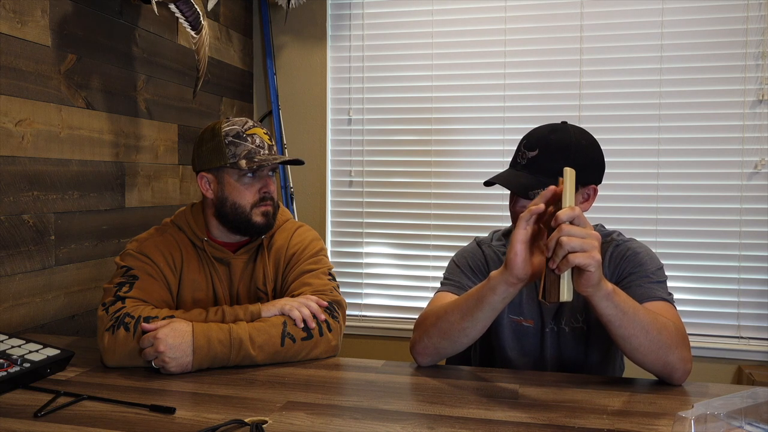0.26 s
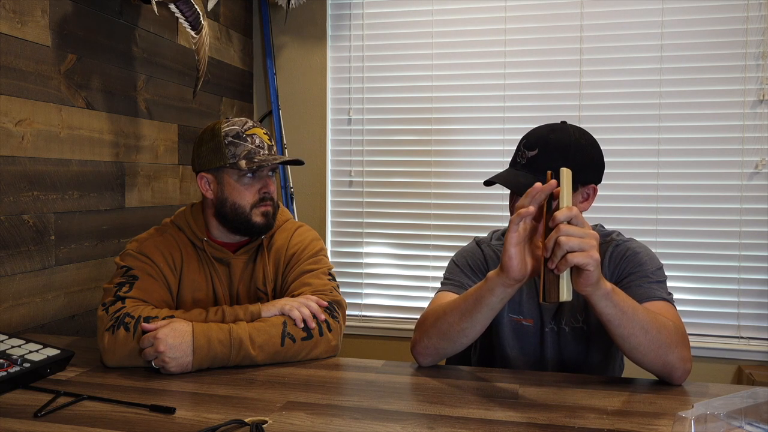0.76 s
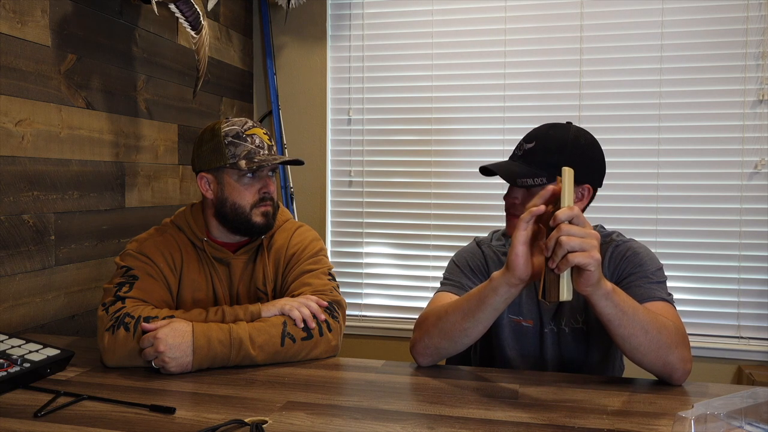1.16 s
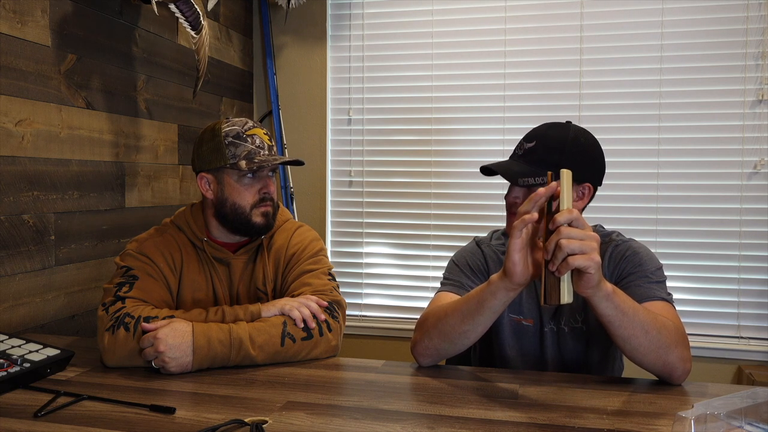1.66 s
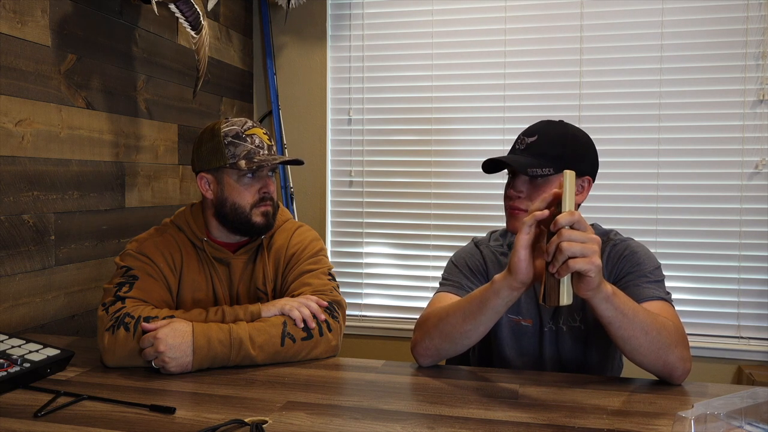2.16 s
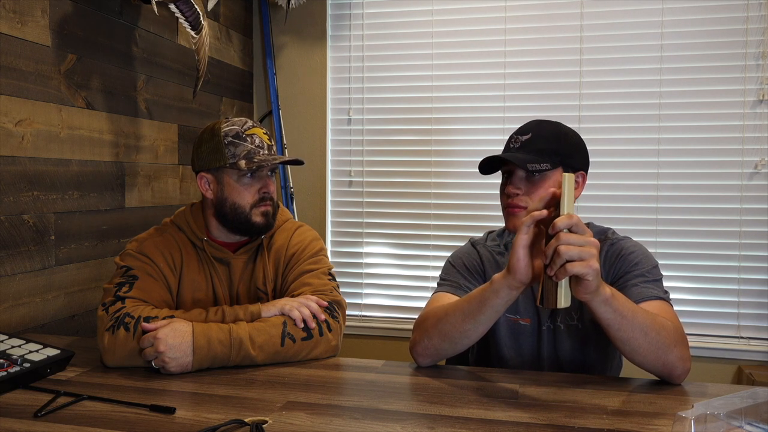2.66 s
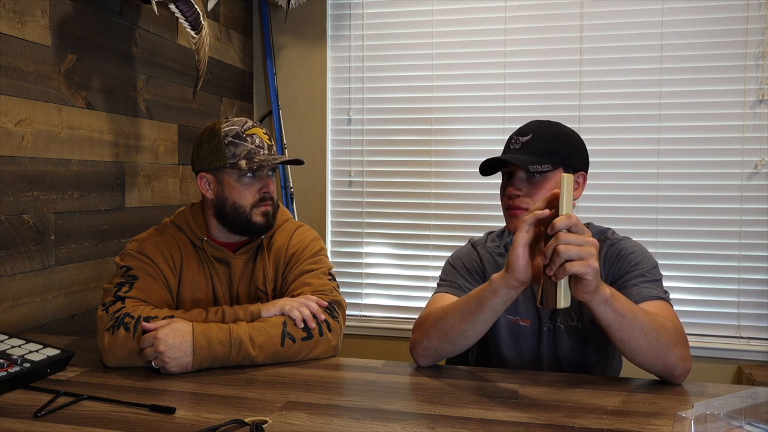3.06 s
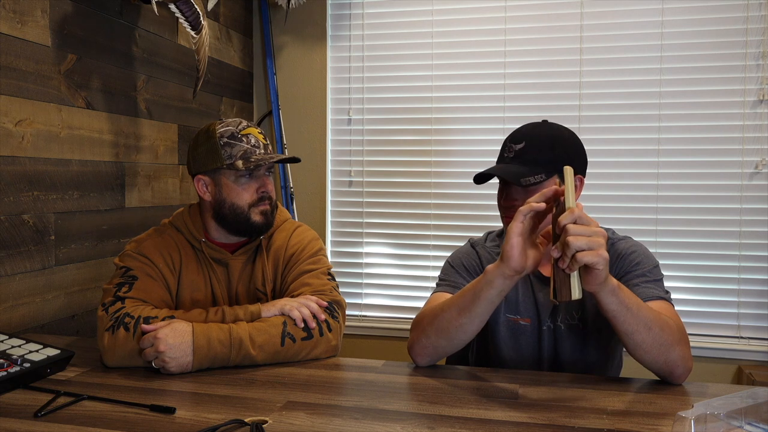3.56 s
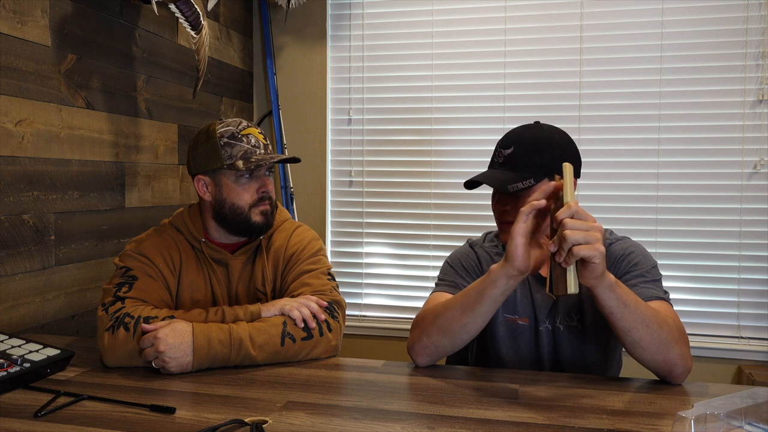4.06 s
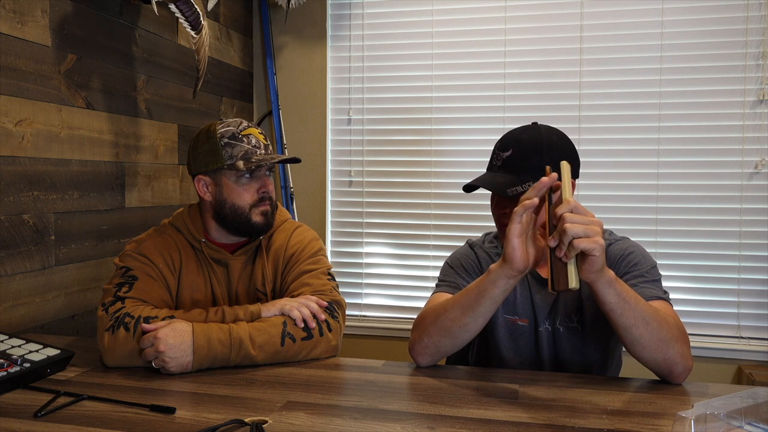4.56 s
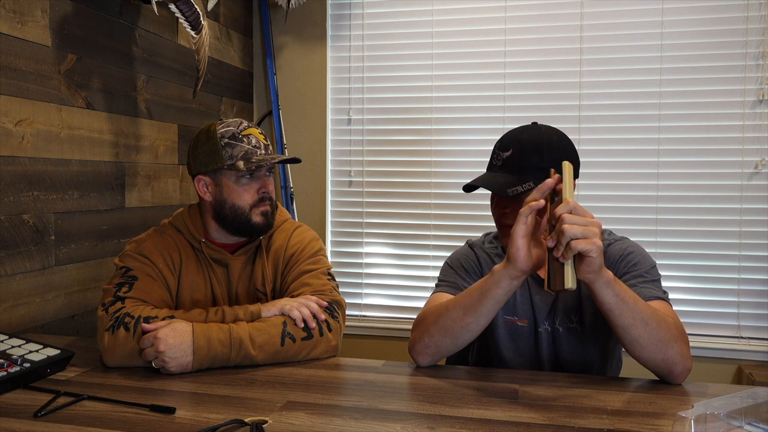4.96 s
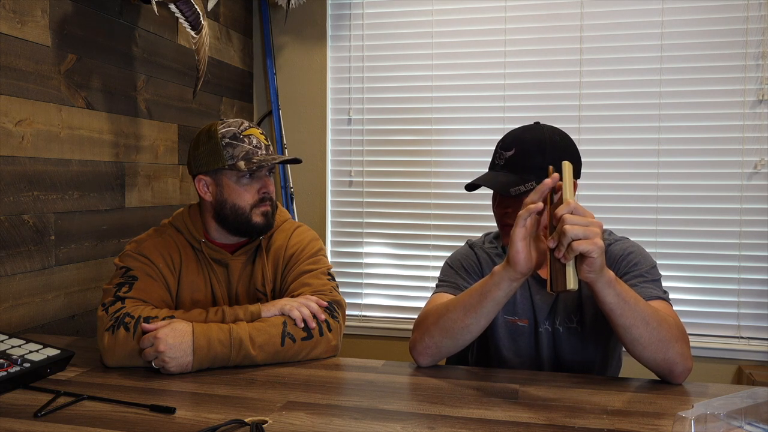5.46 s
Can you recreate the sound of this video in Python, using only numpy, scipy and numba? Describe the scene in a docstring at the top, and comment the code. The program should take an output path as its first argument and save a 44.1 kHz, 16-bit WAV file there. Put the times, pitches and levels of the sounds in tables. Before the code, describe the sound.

Close, loud wooden box call in a small room: about three even yelps a second, each starting with a short clear high note, cracking into a rasp and dropping to a hollow lower note. After eleven strokes there is a short gap with a faint wooden tap, then eight more yelps, softer-edged at first, then brighter. Short table echoes and room tail; low rumble and thin hiss stay behind.

```python
"""Wooden box call indoors

A chalked lid is stroked over the thin wall of a box and sticks and slips hundreds of times a second.
Most strokes start clean, break into a rasp and roll over to a lower note; box modes colour the slips.
Table echoes and a small room ring after them, over low rumble, thin hiss and faint squeaks.
A limiter pulls the whole mix down, rumble included, whenever its peaks pass the ceiling."""
import sys
import numpy as np
from scipy import signal
from scipy.fft import rfft, irfft, next_fast_len
from scipy.io import wavfile
from scipy.ndimage import uniform_filter1d, minimum_filter1d, map_coordinates
from numba import njit

SR = 44100
rng = np.random.default_rng(int(sys.argv[2]) if len(sys.argv) > 2 else 0)


def log_audio(samples):
    """Write samples as a 16-bit WAV file to the path given in sys.argv[1]."""
    # one column per channel
    frames = np.atleast_2d(samples).T
    # limit to full scale, then quantise
    limited = np.clip(frames, -1, 1)
    pcm = np.round(limited * 32767).astype(np.int16)
    wavfile.write(sys.argv[1], SR, pcm)


N = 251811

# strokes of the lid; all times but start_s and the two lengths count from the start of the stroke:
# start_s, catch_hz, clean_length_s, clean_hz, break_hz, break_raspiness (0-1), roll_length_s,
# low_reached_s, low_hz, low_left_s, lift_hz, catch_force_db, low_force_db, ease_force_db,
# brightness_db, slide_back_db (all levels relative)
STROKES = [ (0.033, 890.6, 0.03, 793.7, 954.5, 0.77, 0.018, 0.084, 651, 0.099, 730, -8.5, 2, -11, 2, -42),
           (0.331, 868, 0.035, 782.2, 947, 0.58, .015, 0.071, 650.6, 0.084, 740, -3, 5.5, -9.5, 0.5, -43),
           (0.617, 855, 0.049, 782.6, 916, 0.74, 0.016, 0.083, 644.2, 0.098, 714, -11.5, 2.5, -8.5, 1, -41.5),
           (0.925, 899, 0.023, 788, 934, 0.5, 0.033, 0.079, 710, .099, 777.4, -8, -2.5, -11.5, 0, -42.5),
           (1.213, 878, 0.047, 779, 954.7, 0.54, 0.027, .089, 647, .101, 727.6, -14, 1.5, -14, 1.5, -47),
           (1.515, 900, 0.033, 803, 964, 0.47, .014, 0.085, 645, 0.11, 724, -10, 1.5, -14.5, 6.5, -47),
           (1.813, 916, 0.025, 824, 955.4, 0.71, .02, 0.075, 668.5, 0.091, 730.4, -2.5, 0, -15.5, 3, -51),
           (2.112, 868.4, 0.034, 779.5, 938, 0.64, 0.027, 0.096, 789.3, 0.087, 850.3, -2, -11, -13, 2, -46.5),
           (2.410, 893.3, 0.038, 776.6, 942, 0.51, 0.023, 0.084, 654, 0.11, 725.7, -13.5, -2.5, -11, 3, -48),
           (2.724, 876, 0.04, 795.6, 919, 0.68, .02, .089, 686.4, 0.098, 751.3, -13, -0.5, -18, 7.5, -51.5),
           (3.026, 870, 0.038, 795.7, 945, 0.47, .015, 0.078, 648.3, 0.082, 620, -10, -6, -13, 4.5, -84),
           (3.499, 837, 0.022, 756.5, 765.7, 0.04, 0.034, 0.08, 722.8, 0.11, 921, -13.5, -3, -23, -27, -43),
           (3.821, 848, .049, 750, 712.5, 0.3, 0.022, .085, 648.5, .107, 781.5, -13.5, 3, -12, -9, -41),
           (4.128, 887, 0.038, 758.3, 741, 0.22, 0.023, 0.075, 633.3, 0.12, 766.4, -8.5, 1, -8, 0, -40),
           (4.432, 883.7, 0.025, 788.6, 757, 0.17, 0.022, 0.063, 626.6, 0.086, 781, -11, 1, -5.5, -29, -38.5),
           (4.748, 893.7, 0.022, 803.7, 916.7, 0.43, 0.037, 0.082, 653, 0.095, 791, -6, -2, -6.5, 1.5, -39),
           (5.059, 940.5, 0.016, 863, 963.4, .35, .025, 0.058, 660.4, 0.095, 764, -3, 0, -8.5, -2.5, -38.5),
           (5.365, 942, .018, 871.6, 947, 0.34, 0.026, .056, 654.3, 0.083, 744, -0.5, 1.5, -3.5, -3, -39),
           (5.666, 938, 0.016, 808, 907, 0.38, 0.023, 0.065, 645, 0.12, 743, -12, -4, -6, 1, -45), ]
# resonances of the box walls and air: centre_hz, width_hz, level_db (relative)
BOX = [(685, 334, -14), (1412, 454, 0), (1877, 203, 4.5), (2172, 128, -0.5), (2420, 794, -5),
       (3208, 193, 3.5), (4018, 295, -4.5), (5150, 370, -15), (5630, 475, -15.5), (7650, 244, -23),
       (8250, 330, -21), (11900, 2900, -33), (11400, 480, -31), (13960, 5800, -37)]

LIFT_S = 0.055  # from leaving the low note until the lid leaves the wall
ATTACK_S = 0.0049  # the lid bites
ENDS = [stroke[0] + stroke[9] + LIFT_S for stroke in STROKES]


def amp(db):
    """Gain of a level in dB."""
    return 10 ** (np.asarray(db) / 20)


def unit(x):
    """x at rms 1."""
    return x / np.sqrt(np.mean(x ** 2) + 1e-20)


def along(points, hz):
    """Values read off (Hz, value) points on a log frequency axis."""
    f, v = np.transpose(points)
    return np.interp(np.log(hz + 1), np.log(f + 1), v)


def wobble(rate):
    """A smooth random curve, rate knots a second."""
    knots = rng.standard_normal(int(N * rate / SR) + 4)
    return map_coordinates(knots, [np.arange(N) * rate / SR])


def filtered(x, response):
    """x through a complex response of frequency."""
    m = next_fast_len(N + SR // 2)
    return irfft(rfft(x, m) * response(np.fft.rfftfreq(m, 1 / SR)), m)[..., :N]


def joined(rows):
    """Straight lines between timed rows: one curve for each column after the time."""
    s, *cols = np.transpose(rows)
    s = np.maximum.accumulate(s)  # times never run backwards
    return [np.interp(np.arange(N) / SR, s, c) for c in cols]


def floor():
    """Low building rumble with a slow uneven level, and a thin steady hiss, both shaped from noise."""
    # spectrum of the rumble: freq_hz, density_db (relative)
    rumble_shape = [(15, -43.5), (30, -4), (42, 0.5), (90, -1), (125, -8.5), (160, -8), (250, -11.5),
                    (400, -24.5), (700, -22.5), (1500, -76)]
    # spectrum of the hiss: freq_hz, density_db (relative)
    hiss_shape = [(400, 4), (1500, -4.5), (5000, -16), (15000, -58)]

    def noise(spectrum):
        return unit(filtered(rng.standard_normal(N), lambda hz: amp(along(spectrum, hz))))

    rumble = amp(-45.5 + 0.17 * wobble(2.7)) * noise(rumble_shape)
    return rumble + amp(-57.0) * noise(hiss_shape)


def modes(f):
    """The causal band-pass response of each mode of the box, one row a mode, with alternating sign."""
    # the small box radiates little bass: freq_hz, gain_db
    radiation = [(300, -10.5), (600, -5.5), (1000, 0.5), (1500, 2), (8000, -1), (15000, -10)]
    rows = []
    for k, (centre, width, db) in enumerate(BOX):
        damping = 1j * f * width
        rows.append((-1) ** k * amp(db) * damping / (centre * centre - f * f + damping))
    return np.array(rows) * amp(along(radiation, f))


def wood(f):
    """The response of the whole box: the sum of its modes."""
    return modes(f).sum(axis=0)


def previous_stroke():
    """The stroke before dies away at the start, as fading noise through the box."""
    fade = amp(-44.0 - 230 * np.arange(N) / SR)
    return fade * unit(filtered(rng.standard_normal(N), wood))


def squeaks():
    """Short faint tones that swell and fade, each with an octave overtone."""
    # squeaks: start_s, end_s, pitch_hz, level_db (peak of the fundamental)
    squeak_list = [(1.127, 1.24, 433.6, -51.5), (1.337, 1.494, 437, -50), (1.472, 1.541, 562.6, -47)]
    t, out = np.arange(N) / SR, np.zeros(N)
    for start, end, hz, db in squeak_list:
        swell = np.sin(np.pi * np.clip((t - start) / (end - start), 0, 1))
        tone = np.sin(2 * np.pi * hz * t) + 0.33 * np.sin(4 * np.pi * hz * t)
        out += amp(db) * swell * tone
    return out


def taps():
    """The lid touches the box while it is set back: a decaying noise burst rings the wood."""
    # light knocks: start_s, level_db (relative)
    knocks = [(3.3833, -43)]
    out, t = np.zeros(N), np.arange(SR // 20) / SR
    for s, db in knocks:
        burst = amp(db + 7.0 - 60 * t / 0.18) * rng.standard_normal(len(t))
        out[round(s * SR):][:len(t)] += burst
    return filtered(out, wood)


def slide_back():
    """The lid brushes lightly back over the wall around the end of each stroke: swelling noise in the wood."""
    t, level = np.arange(N) / SR, np.zeros(N)
    for (*_, db), end in zip(STROKES, ENDS):
        level += amp(db) * np.sin(np.pi * np.clip((t - end + 0.024) / 0.13, 0, 1))
    # a light touch wakes the high modes most
    brush = filtered(rng.standard_normal(N), lambda f: wood(f) * f / 3000)
    return level * amp(5.0 * wobble(58)) * unit(brush)


def push():
    """Force and brightness in dB: the lid catches within a few ms, bears down, eases and lifts."""
    attack_db, lift_db = 36, 12.5  # force gained in the bite, force lost as the lid leaves
    ease_s = 0.051  # the force has eased this long before the end
    bloom_s, dull_db, bloom_db = 0.02, 12, 8  # the treble starts dull and peaks a little after the catch
    rows = []
    for stroke, end in zip(STROKES, ENDS):
        start, *_, low_s, _, _, _, catch_db, low_db, ease_db, bright_db, _ = stroke
        rows += [
            (start, catch_db - attack_db, bright_db - dull_db),
            (start + ATTACK_S, catch_db, bright_db - dull_db / 2),
            (start + bloom_s, catch_db + 1.5, bright_db + bloom_db),
            (start + low_s, low_db, bright_db),
            (end - ease_s, ease_db, bright_db),
            (end, ease_db - lift_db, bright_db)]
    return joined(rows)


def slip_rate():
    """Slips a second and raspiness (0-1) through catch, clean note, break, low note and lift."""
    settle_s, settle_left = 0.016, 0.08  # the catch pitch sinks; share of the drop still to go by then
    glide = 0.8  # extra height then, as a share of the drop where the break lies lower
    jump_s, sag = 0.008, 0.12  # jump into the break; its pitch sag at full raspiness
    break_begins, break_lands = 0.2, 0.6  # shares of the break's raspiness before and after the jump
    dip = 0.025  # the low note lies this share above its pitch at the ends, below it in the middle
    rise_s = 0.016  # pitch rise out of the low note
    catch_rasp, clean_rasp, rise_rasp, lift_rasp = 0.12, 0.03, 0.25, 0.6
    low_rasp, low_end_rasp = 0.08, 0.12
    rows = []
    for start, catch, clean_s, clean, high, rasp, roll_s, low_s, low, left_s, lift, *_ in STROKES:
        settled = clean + settle_left * (catch - clean) + glide * max(clean - high, 0)
        rows += [
            (start + ATTACK_S / 2, catch, catch_rasp),
            (start + min(settle_s, 0.8 * clean_s), settled, clean_rasp),
            (start + clean_s, clean, break_begins * rasp),
            (start + clean_s + jump_s, high, break_lands * rasp),
            (start + low_s - roll_s, high * (1 - sag * rasp), rasp),
            (start + low_s, low * (1 + dip), low_rasp),
            (start + (low_s + left_s) / 2, low * (1 - dip), low_rasp),
            (start + left_s, low * (1 + dip), low_end_rasp),
            (start + left_s + rise_s, lift, rise_rasp),
            (start + left_s + LIFT_S, lift, lift_rasp)]
    return joined(rows)


def slip_pulses(turns, hz, rasp):
    """One pulse a slip, placed between samples: nearly even when clean, uneven in time and size when raspy."""
    count = np.arange(1, int(turns[-1]))
    at = np.interp(count, turns, np.arange(N))
    chance = rng.standard_normal((6000, 2))[:len(at)]
    here = at.astype(int)
    shift = 0.085 * rasp[here] * chance[:, 0]  # slips come early or late, in periods
    at = np.clip(at + shift * SR / hz[here], 0, N - 1)
    size = amp((0.4 + 4 * rasp[here]) * chance[:, 1]) * np.sqrt(SR / hz[here])
    # a windowed sinc spreads each pulse over 16 samples
    spots = at.astype(int)[:, None] + np.arange(-7, 9)
    gap = spots - at[:, None]
    pulses = size[:, None] * np.sinc(gap) * np.cos(np.pi * gap / 16) ** 2
    return np.bincount(np.clip(spots, 0, N - 1).ravel(), pulses.ravel(), N)


def lid():
    """Stick-slip of the lid on the wall: slip pulses and chalk scrape drive each mode of the box."""
    t = np.arange(N) / SR
    hz, rasp = slip_rate()
    hz = uniform_filter1d(hz, size=max(round(0.008 * SR), 1))  # pitch bends rounded over 8 ms
    rasp = np.clip(rasp, 0, 1)
    force_db, bright_db = push()
    touching = sum((t >= stroke[0]) & (t <= end) for stroke, end in zip(STROKES, ENDS))

    turns = np.cumsum(hz * (1 + 0.035 * rasp * wobble(150) + 0.003 * wobble(60))) / SR
    slips = slip_pulses(turns, hz, rasp)
    gate = np.exp(-3 * (turns % 1))  # chalk scrapes just after each slip
    scrape = unit(gate * rng.standard_normal(N))
    scrape_share = np.clip(0.002 + 0.22 * rasp ** 2, 0, 0.6)  # of the power
    rub = np.sqrt(1 - scrape_share) * slips + np.sqrt(scrape_share) * scrape
    judder_db = (0.9 + 5.5 * rasp) * wobble(80)
    rub *= amp(force_db + judder_db) * touching

    edge = filtered(rub, lambda f: 1j * f / (5000 + 1j * f))  # the sharp part of each slip
    spurts_db = 2.5 * wobble(40)
    sharp = amp(bright_db - 37.0 * rasp + spurts_db)  # raspiness dulls the slips
    drive = rub + (sharp - 1) * edge

    # the contact moves along the wall and feeds each mode more or less
    contact = np.array([wobble(45) for _ in BOX])
    feed_db = (1.6 + 2 * rasp) * contact
    feed_db[0] -= 14 * rasp  # a raspy contact hardly drives the lowest mode
    sound = np.sum(amp(feed_db) * filtered(drive, modes), axis=0)
    box_power = np.mean(np.abs(wood(np.linspace(1, SR / 2, 2000))) ** 2)
    return sound / np.sqrt(box_power)


def early_echoes(x):
    """Strong early copies off the table, the hands and the near wall, as delays."""
    # echoes: delay_ms, gain_db
    echoes = [(.9, -17), (2.3, -20.5), (3.7, -8), (6.1, -9), (9.4, -14.5)]

    def response(f):
        return sum(amp(db) * np.exp(-2j * np.pi * f * ms / 1000) for ms, db in echoes)

    return filtered(x, response)


def room(x):
    """Noise tails in which each frequency dies at its own speed; a new random tail is drawn for each stroke."""
    # room decay: freq_hz, t60_s
    decay = [(500, 0.32), (1500, 0.24), (4000, .24), (8000, 0.22), (14000, 0.14)]
    out = np.zeros(N + SR)
    edges = [0] + [round(end * SR) + 400 for end in ENDS]
    for a, b in zip(edges, edges[1:]):
        hz, t, z = signal.stft(rng.standard_normal(SR // 2), SR, nperseg=256)
        fade = amp(-60 * t / along(decay, hz)[:, None])
        tail = signal.istft(z * fade, SR, nperseg=256)[1]
        # the walls are a few metres off, so the answer builds up
        tail *= 1 - np.exp(-(np.arange(len(tail)) / (SR * 0.014)) ** 2)
        wet = signal.fftconvolve(x[a:b], tail / np.linalg.norm(tail))
        out[a:a + len(wet)] += wet
    # thin wall panels swallow the lowest notes
    return filtered(out[:N], lambda f: 1j * f / (900 + 1j * f))


def scene():
    """The call with its echoes and room, over the background."""
    call = lid() + taps() + slide_back()
    background = previous_stroke() + squeaks() + floor()
    return (call + early_echoes(call) + amp(-8) * room(call) + background)[None]


@njit
def follow(power, rise, fall):
    """Running level that rises and falls at its own speeds."""
    out, level = np.empty_like(power), 0.
    for i in range(len(power)):
        level += (rise if power[i] > level else fall) * (power[i] - level)
        out[i] = level
    return out


def record(dry):
    """A look-ahead limiter turns peaks down and lets go over some 27 ms; a steep low-pass trims the top."""
    ceiling, top_hz = 0.92, 15700
    need = np.minimum(1, ceiling / (np.abs(dry[0]) + 1e-9))
    # spread over 177 samples and smoothed, so the gain drops ahead of each peak
    need = uniform_filter1d(minimum_filter1d(need, size=177), size=89)
    need_db = -20 * np.log10(np.abs(need) + 1e-9)
    cut_db = follow(need_db, 1 / (SR * 0.00011), 1 / (SR * 0.027))
    x = filtered(dry * amp(-cut_db), lambda hz: 1 / (1 + (hz / top_hz) ** 300))
    return np.clip(x, -1, 1)


dry = scene()
out = record(dry)
log_audio(out)
```